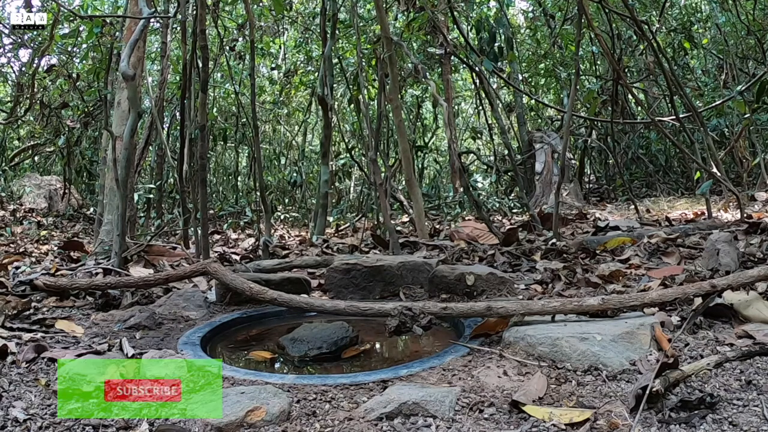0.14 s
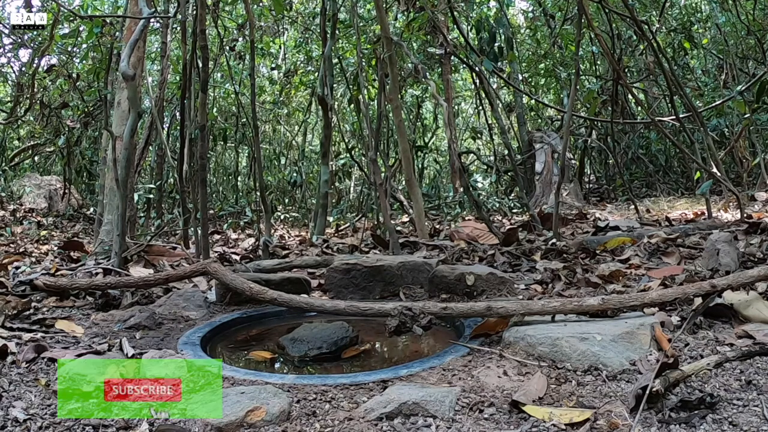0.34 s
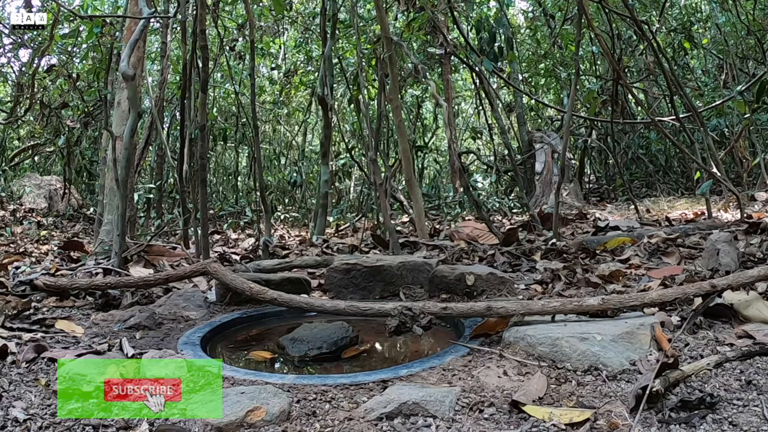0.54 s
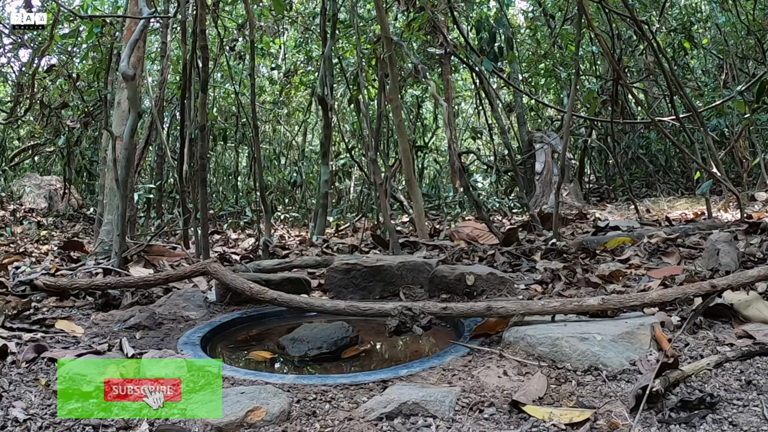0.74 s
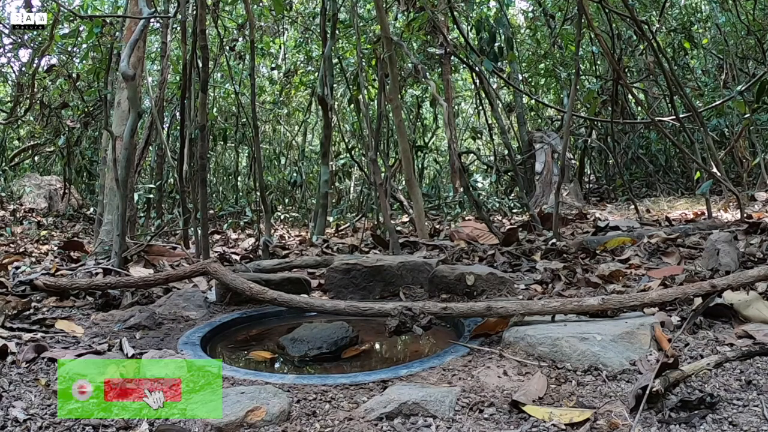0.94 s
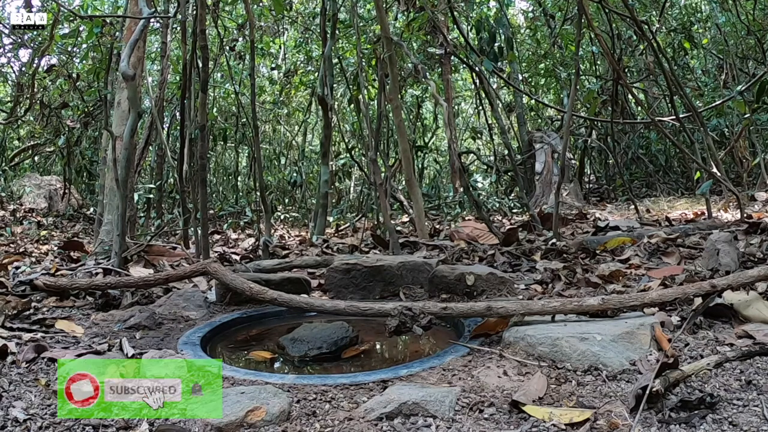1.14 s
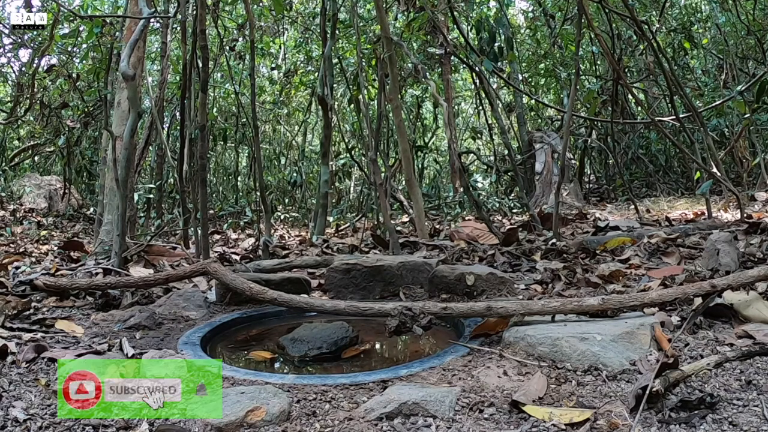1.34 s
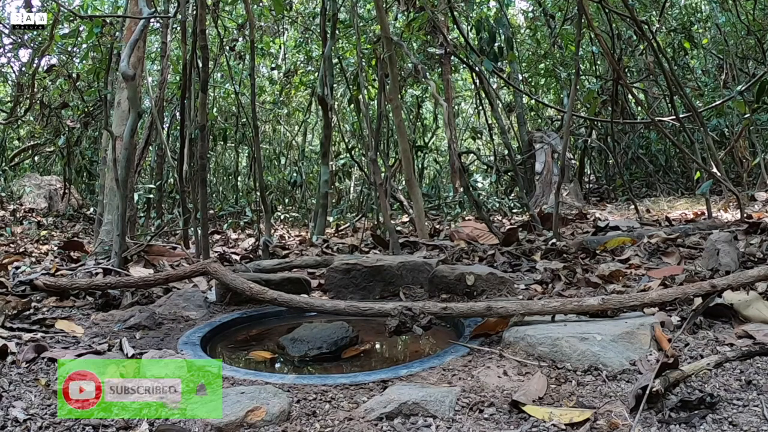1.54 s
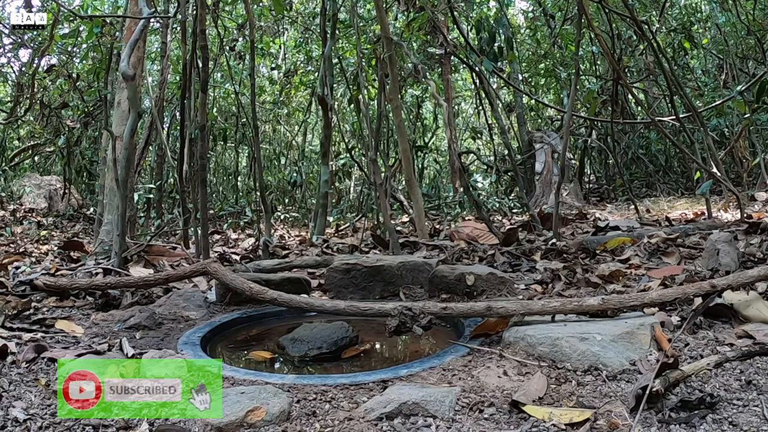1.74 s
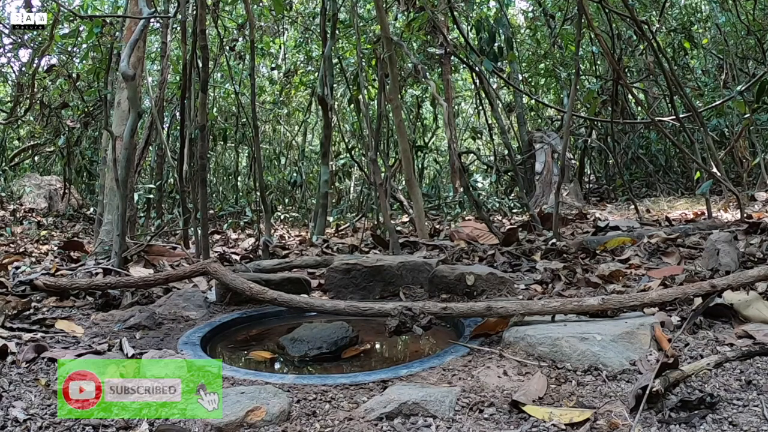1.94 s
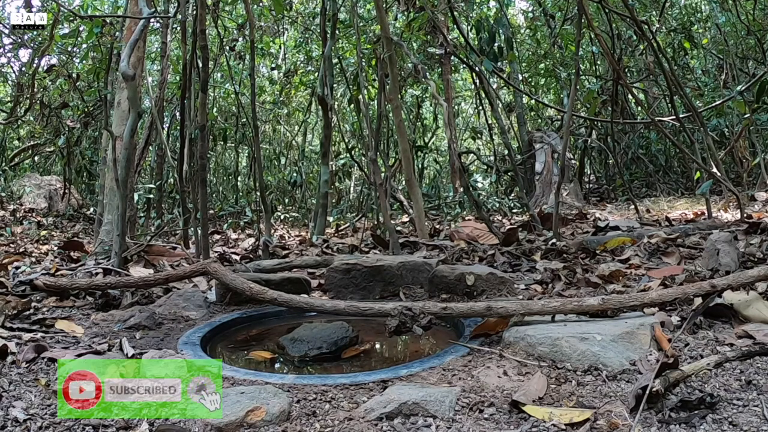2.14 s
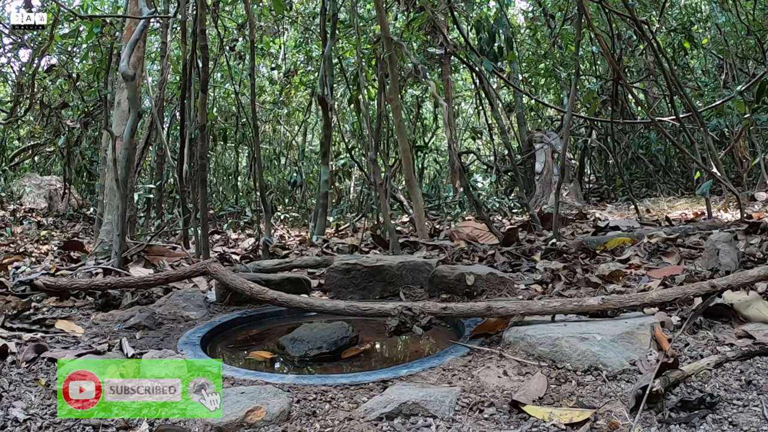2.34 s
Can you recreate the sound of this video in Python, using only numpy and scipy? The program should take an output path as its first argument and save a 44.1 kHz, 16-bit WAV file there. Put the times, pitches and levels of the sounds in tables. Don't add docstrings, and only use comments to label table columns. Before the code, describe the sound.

A near bird repeats sharp nasal chirps snapping into whistles, with wing flutters in echoing woodland.

```python
import sys
import numpy as np
from scipy import signal
from scipy.io import wavfile
from scipy.ndimage import uniform_filter1d

SR = 44100
rng = np.random.default_rng(int(sys.argv[2]) if len(sys.argv) > 2 else 0)


def volts_from_db(level):
    exponent = np.asarray(level, float) / 20
    return 10 ** exponent


def wrap_up_sound(samples):
    columns = np.atleast_2d(samples).T
    tamed = np.clip(columns, -1, 1)
    steps = np.round(tamed * 32767).astype(np.int16)
    wavfile.write(sys.argv[1], SR, steps)


N = 105840


def evened(x):
    return x / np.sqrt(np.mean(x ** 2) + 1e-20)


def read(points, hz):
    f, value = np.transpose(points)
    return np.interp(np.log(hz + 1), np.log(f + 1), value, left=value[0], right=value[-1])


def add(mix, start_s, sound):
    part = mix[..., max(round(start_s * SR), 0):][..., :sound.shape[-1]]
    part += sound[..., :part.shape[-1]]


def seconds(length_s):
    return np.arange(0, length_s, 1 / SR)


def panned(x, db):
    return x * volts_from_db(np.array([[db / 2], [-db / 2]]))


def fade_edges(t, rise_s, fall_s):
    return np.clip(t / rise_s, 0, 1) * np.clip((t[-1] - t) / fall_s, 0, 1)


def bump(u, at, width):
    return np.exp(-((u - at) / width) ** 2)


def arch(t):
    return np.sin(np.pi * t / t[-1])


def tone(hz, k=1):
    return np.sqrt(2) * np.sin(2 * np.pi * k * np.cumsum(hz) / SR)


def wobble(size, width):
    return evened(uniform_filter1d(uniform_filter1d(rng.standard_normal(size), width), width))


# pitch in Hz, likeness from -1 to 1.
EAR_LIKENESS = [(70, 0.35), (150, -0.19), (500, -0.8), (2000, -0.14), (6000, 0.13), (15000, -0.55)]


def hiss(colour_db, patchy_db):
    hz = np.fft.rfftfreq(1024, 1 / SR)
    a, b, c, d, patch = rng.standard_normal((N // 256 + 5, 513, 5)).T
    patch = uniform_filter1d(uniform_filter1d(patch, size=10, axis=0), size=10, axis=1)
    same = np.clip(read(EAR_LIKENESS, hz), -1, 1)[:, None]
    left = a + 1j * b
    right = same * left + np.sqrt(1 - same ** 2) * (c + 1j * d)
    z = np.array([left, right]) * volts_from_db(colour_db(hz)[:, None] + patchy_db * evened(patch))
    return evened(signal.istft(z, nperseg=1024, noverlap=768)[1][:, :N])


def banded(table):
    return lambda hz: read(table, hz) - 60 * (hz > table[-1][0])


# pitch in Hz, time to die by 60 dB in seconds.
ECHO_TIMES = [(800, 0.93), (1600, 0.59), (3000, 0.63), (4500, 0.4), (9000, 0.32)]


def echo(x, lumpy_db=4):
    early, early_s, same = 0.39, 0.0057, 0.76
    a, b = rng.standard_normal((2, SR)) * volts_from_db(lumpy_db * wobble(SR, 40))
    i = np.arange(SR)
    taps = np.array([a, same * a + np.sqrt(1 - same ** 2) * b])
    taps = taps * (i > 130)
    taps = taps * (1 + early * np.exp(-i / SR / early_s))
    hz, t, z = signal.stft(taps, SR, nperseg=256)
    fading = volts_from_db(-60 * t / read(ECHO_TIMES, hz)[:, None])
    tail = signal.istft(z * fading, SR, nperseg=256)[1]
    return signal.fftconvolve(x[None], tail / np.linalg.norm(tail[0]), axes=1)[:, :N]


# pitch in Hz, level in dB.
WOOD_COLOUR = [(20, -4), (110, -28), (145, 3.5), (240, -3), (330, -8), (500, -14.5), (780, -6.5),
               (1200, -21), (1700, -17)]
# time in seconds, level in dB.
WOOD_SWELL = [(0, 2), (.8, -1), (1.302, -1.5), (1.699, 1.5), (2, -1.5), (2.4, 3)]
# pitch in Hz, level in dB.
LEAF_COLOUR = [(1100, -43), (1800, -4), (2400, -15.5), (4000, -11), (8300, -14.5), (10000, -35.5),
               (13000, -38.5), (15600, -45)]
# middle pitch in Hz, width in Hz, level in dB.
INSECT_BANDS = [
    (6110, 340, -59.5),
    (7940, 500, -58.5),
]


def forest():
    swell = volts_from_db(np.interp(np.arange(N) / SR, *np.transpose(WOOD_SWELL)))
    rumble = volts_from_db(-53.5) * swell * hiss(banded(WOOD_COLOUR), patchy_db=0.49)
    out = rumble + volts_from_db(-51.5) * hiss(banded(LEAF_COLOUR), patchy_db=2.6)
    for middle_hz, width_hz, db in INSECT_BANDS:
        def band(hz):
            return np.maximum(-6 * ((hz - middle_hz) / width_hz) ** 2, -90)
        out = out + volts_from_db(db) * hiss(band, patchy_db=6.7)
    return out


# start in seconds, length in seconds, first pitch in Hz, last pitch in Hz,
# level in dB.
FAR_WHISTLES = [(0, .1, 2150, 2050, -57), (0, .11, 2000, 1960, -56), (0, .1, 1880, 1820, -56),
                (.145, .06, 2860, 3210, -58), (.193, .03, 1200, 1250, -57), (.205, .05, 1450, 1550, -56),
                (.356, .033, 1086, 1330, -57), (.515, .04, 1250, 1200, -57), (.632, .07, 1520, 1470, -57),
                (.715, .025, 1000, 1050, -61), (1.043, .077, 1015, 1119, -61.5),
                (1.427, .04, 2015, 1616, -53), (1.454, .083, 1620, 1693, -57),
                (1.494, .1175, 1707, 1844, -53), (1.53, .16, 1850, 2050, -56), (1.547, .2, 2913, 2940, -65),
                (1.725, .08, 2500, 2485, -56.5), (1.82, .06, 7800, 7700, -61),
                (1.997, .196, 1944, 1876, -59.5), (2.19, .068, 1743, 1694, -60.5),
                (2.31, .09, 3400, 3700, -55), (2.33, .07, 3950, 3700, -54)]


def far_birds():
    dry = np.zeros(N)
    waver = 1 + .007 * wobble(N, 200)
    flicker = 1 + .3 * wobble(N, 70)
    for start_s, length_s, from_hz, to_hz, db in FAR_WHISTLES:
        t = seconds(length_s)
        i = min(round(start_s * SR), N - round(length_s * SR) - 1)
        part = slice(i, i + len(t))
        hz = (from_hz + (to_hz - from_hz) * t / length_s) * waver[part]
        level = volts_from_db(db - 3 * t / length_s) * flicker[part]
        add(dry, start_s, level * tone(hz) * fade_edges(t, .012, .015))
    return panned(dry, 1.2) + volts_from_db(4.5) * echo(dry)


# time in seconds, pitch in Hz, level in dB.
LOW_COOS = [
    [(.834, 878, -47), (.845, 907, -45), (.864, 776.5, -44.5), (.885, 899, -36), (.93, 791, -36),
     (.95, 804, -34.5), (.982, 775, -50)],
    [(.985, 1013, -42), (1.008, 804.5, -40.5), (1.04, 812, -46), (1.055, 770, -58)],
    [(1.068, 789, -46), (1.105, 726.6, -37), (1.15, 778, -38), (1.168, 760, -66)],
    [(1.21, 794, -49.5), (1.265, 703, -37.5), (1.29, 744, -40.5), (1.325, 807.7, -33.5), (1.362, 820, -47)],
]
# time in seconds, pitch in Hz, level in dB.
HIGHER_COO = [(.834, 1115, -45), (.862, 1007, -54), (.888, 1115, -39.5), (.915, 1058, -42.5),
              (.965, 1062, -36.5), (.99, 1050, -61)]


def doves():
    dry = np.zeros(N)
    for note in list(LOW_COOS) + [HIGHER_COO]:
        s, hz, db = np.transpose(note)
        t = seconds(s[-1] - s[0])
        pitch = uniform_filter1d(np.interp(t + s[0], s, hz), size=500, mode="nearest")
        level = volts_from_db(-1.5 + np.interp(t + s[0], s, db))
        add(dry, s[0], tone(pitch) * level * fade_edges(t, 0.0068, 0.013))
    return panned(dry, -0.4) + volts_from_db(-11.5) * echo(dry)


def beats(table, air, rise_s, fall_s, trim_db, pan_db):
    gate = np.zeros(N)
    t = np.arange(-800, 2400) / SR
    puff = np.exp(np.where(t < 0, t / rise_s, -t / fall_s)) + 0.87 * bump(t, 0, 0.00052)
    for peak_s, db in table:
        add(gate, peak_s + t[0], puff * volts_from_db(db + trim_db))
    near = hiss(banded(air), patchy_db=1.7)
    return panned(gate, pan_db) * (0.42 * near[0] + 1.11 * near)


# time in seconds, peak level in dB.
WING_BEATS = [
    (0.032, -25),
    (0.066, -23),
    (0.1, -23.5),
    (0.139, -26),
]
# pitch in Hz, level in dB.
BEAT_COLOUR = [(1470, -73), (2500, -19), (4910, -6), (6530, 1), (7360, -5), (7810, -12.5), (10000, -19),
               (11200, -47), (15000, -33)]
# start in seconds, level in dB.
LOW_STROKES = [
    (2.064, -43),
    (2.09, -34.5),
    (2.103, -41),
    (2.131, -35),
    (2.143, -37.5),
    (2.175, -37.5),
    (2.19, -46),
]
# pitch in Hz, level in dB.
FEATHER_COLOUR = [(1300, -24), (2200, -8), (3700, -9.5), (5300, -12), (8000, -15.5), (10500, -26),
                  (14000, -42), (15600, -42)]
# start in seconds, length in seconds, level in dB, change in dB.
FLIGHT_HISS = [
    (0, 0.23, -53, 5.5),
    (0.236, 0.34, -49, -5.5),
    (0.95, 0.61, -49, 0),
    (1.79, 0.19, -64, -12),
    (1.54, .28, -57, -4),
    (2.0, .2, -62, 3),
    (2.183, .27, -48, -1),
]


def wings():
    flutter = [(.9215 + k * .0541, -29.5 - 2 * (1 - k % 2)) for k in range(12)]
    out = beats(WING_BEATS, BEAT_COLOUR, rise_s=0.0041, fall_s=0.011, trim_db=-14, pan_db=-12)
    out = out + beats(flutter, FEATHER_COLOUR, rise_s=0.0076, fall_s=0.014, trim_db=-12, pan_db=0.28)

    t = seconds(.022)
    for peak_s, db in WING_BEATS:
        hz = (850 + 3e6 * t ** 2) * (1 + .1 * wobble(len(t), 40))
        whirr = tone(hz) * arch(t) * (1 + .4 * wobble(len(t), 40))
        add(out, peak_s - .012, panned(whirr * volts_from_db(db - 24.5), -14))

    t = seconds(.03)
    for start_s, db in LOW_STROKES:
        hz = 165 * rng.uniform(.85, 1.18) + 1500 * t
        thump = np.sin(2 * np.pi * hz * t) * arch(t) * np.exp(-t / 0.0044)
        add(out, start_s, panned(volts_from_db(db + 12) * thump, -1.1))

    t = seconds(.04)
    gust = volts_from_db(-54) * tone(55 + 0 * t) * arch(t) ** 2
    add(out, 2.1, panned(gust, 0))

    gate = np.zeros(N)
    for start_s, length_s, db, change_db in FLIGHT_HISS:
        t = seconds(length_s)
        add(gate, start_s, volts_from_db(db + change_db * t / length_s) * fade_edges(t, 0.025, 0.016))
    air = hiss(banded(FEATHER_COLOUR), patchy_db=2)
    return out + gate * volts_from_db(1.95 * wobble(N, 250)) * (air + 0.43 * air[0])


# share of the nasal part, pitch in Hz.
NASAL_PATH = [(0, 722), (.2, 800), (.42, 736.5), (.6, 935.5)]


def nasal_call(t, top_hz, first_db, second_db, last_hz):
    u = t / t[-1]
    path = np.transpose(list(NASAL_PATH) + [(0.88, last_hz)])
    hz = uniform_filter1d(np.interp(u, *path), size=200, mode="nearest")
    hz = hz * (1 + .012 * wobble(len(t), 60))
    first = np.clip(t / .008, 0, 1) * np.exp(-(u / 0.45) ** 4)
    low_swell, top_swell = bump(u, 0.72, 0.21), bump(u, 0.902, 0.11)
    second = [low_swell, low_swell, top_swell]
    nasal = volts_from_db(first_db[2] - 13.5) * first * tone(hz, k=5)
    for k in range(3):
        level = volts_from_db(first_db[k]) * first + volts_from_db(second_db[k]) * second[k]
        burr = 1 + 0.28 * (1 + u) * wobble(len(t), 40)
        nasal = nasal + tone(hz, k + 2) * level * burr
    left_s = t[-1] - t
    snap_hz = top_hz * (1.2 - 110 * np.minimum(left_s, .005))
    nasal = nasal + volts_from_db(-14) * bump(left_s, .0025, .001) * tone(snap_hz)
    nasal = nasal + volts_from_db(-39) * bump(left_s, 0.0018, 0.00097) * rng.standard_normal(len(t))
    return nasal * fade_edges(t, .002, .002)


def whistle_call(top_hz, share):
    t = seconds(0.024)
    slow_rise = (1 - share) * np.exp(-t / .011)
    leap = (share - .74) * np.exp(-t / .003)
    hz = top_hz * (1 - slow_rise - leap)
    shape = np.sin(np.pi / 2 * fade_edges(t, .0015, .004)) ** 2 * volts_from_db(-4 * t / t[-1])
    whistle = tone(hz) * shape * (1 + .2 * wobble(len(t), 90))
    partner = volts_from_db(-24.5) * tone(hz, 1.8) * shape * wobble(len(t), 24)
    return whistle, partner


def chirp(start_s, whistle_s, top_hz, effort_db, facing_db, first_db, second, share):
    *second_db, last_hz, pan_db = second
    nasal = nasal_call(seconds(whistle_s - start_s), top_hz, first_db, second_db, last_hz)
    whistle, partner = whistle_call(top_hz, share)
    dry, wet = np.zeros((2, N))
    add(dry, start_s, volts_from_db(effort_db) * np.concatenate([nasal, whistle]))
    add(wet, start_s, volts_from_db(effort_db) * np.concatenate([volts_from_db(-8) * nasal, whistle + partner]))
    return panned(dry, pan_db) * volts_from_db(facing_db) + volts_from_db(5.5) * panned(echo(wet), 0.17 * pan_db)


# start in seconds, whistle start in seconds, top whistle pitch in Hz, effort in dB,
# how much the beak faces us in dB.
CHIRP_TIMES = [
    (0.217, 0.281, 5162, -25.5, 7),
    (0.429, 0.498, 4817, -24, 0.5),
    (0.73, .800, 4455, -26, 0.5),
    (.927, 0.988, 4435, -31, 1),
    (1.153, 1.221, 4348, -28.5, 1),
    (1.748, 1.815, 4150, -35, -0.5),
]
# overtones 2, 3 and 4 in dB.
FIRST_PARTS = [(-28.5, -22.5, -13.5), (-25.5, -16, -12.5), (-19.5, -16, -17), (-13.5, -12.5, -11),
               (-14, -12.5, -16.5), (-18, -10, -7.5)]
# overtones 2, 3 and 4 in dB, last pitch in Hz, left over right in dB.
SECOND_PARTS = [(-19.5, -12.5, -4, 860, 7.5), (-15, -10, -7.5, 810, 9), (-17, -11.5, -4.5, 800, 7),
                (-13.5, -12.5, 1.5, 790, 5.5), (-16, -13, -2, 765, 4), (-14, -3, -0.5, 830, 4)]
RISE_FROM = [.8, 0.75, .87, .87, .89, .9]


def near_bird():
    calls = zip(CHIRP_TIMES, FIRST_PARTS, SECOND_PARTS, RISE_FROM)
    return sum(chirp(*times, first, second, share) for times, first, second, share in calls)


def scene():
    return forest() + far_birds() + doves() + wings() + near_bird()


def top_cut(x):
    return signal.sosfilt(signal.butter(12, 15660, fs=SR, output="sos"), x)


def record(dry):
    return top_cut(dry)


dry = scene()
out = record(dry)
wrap_up_sound(out)
```